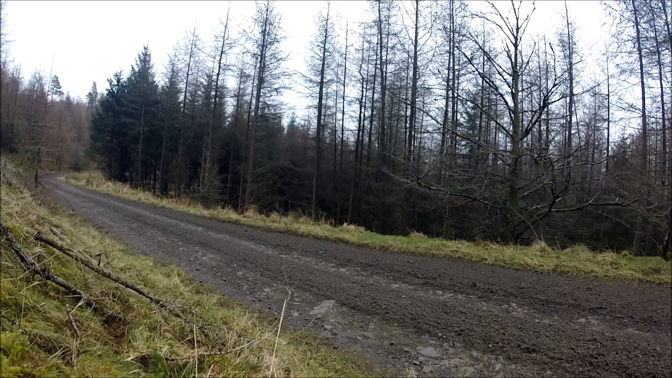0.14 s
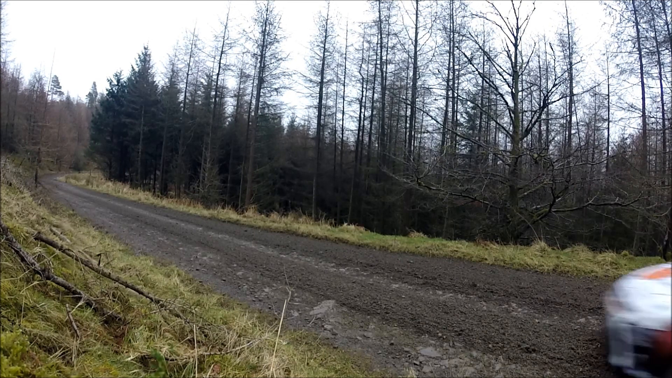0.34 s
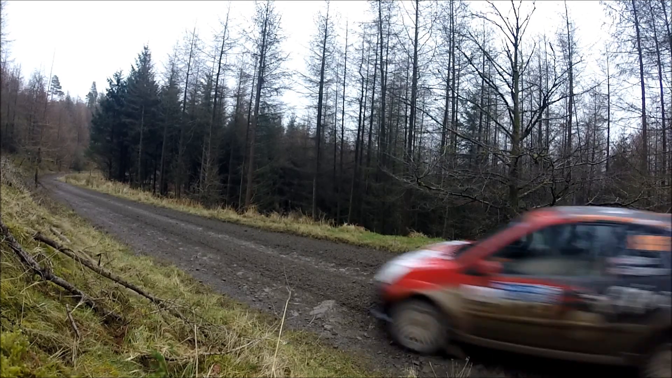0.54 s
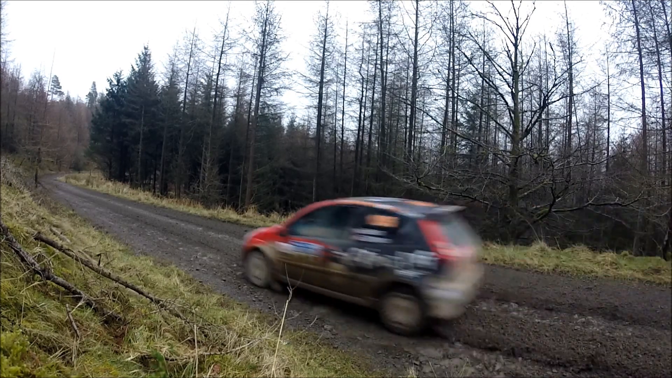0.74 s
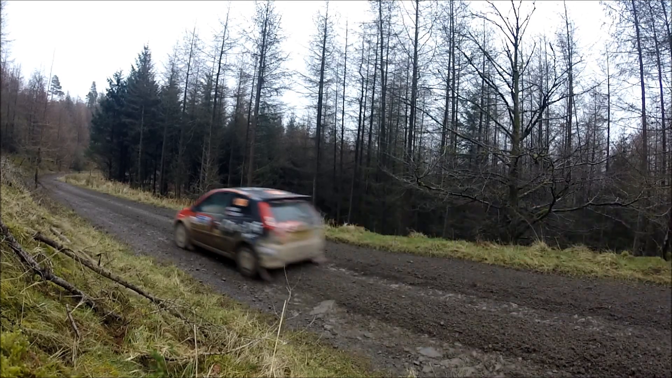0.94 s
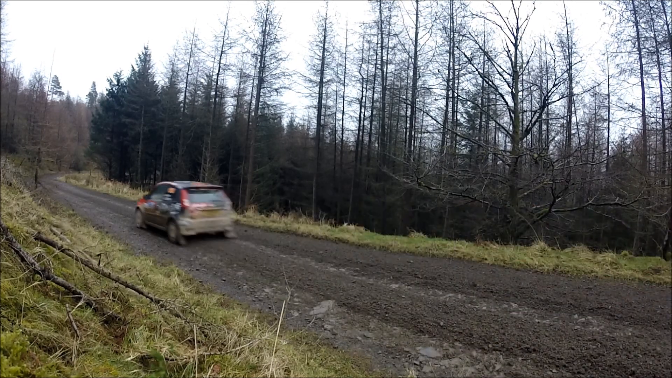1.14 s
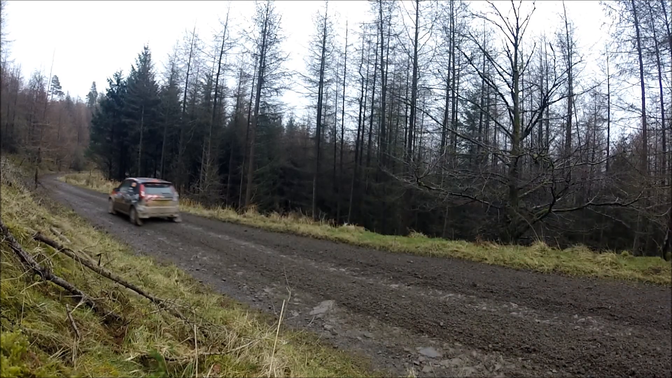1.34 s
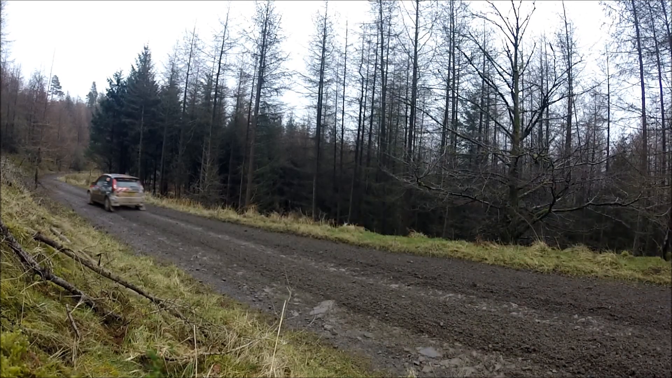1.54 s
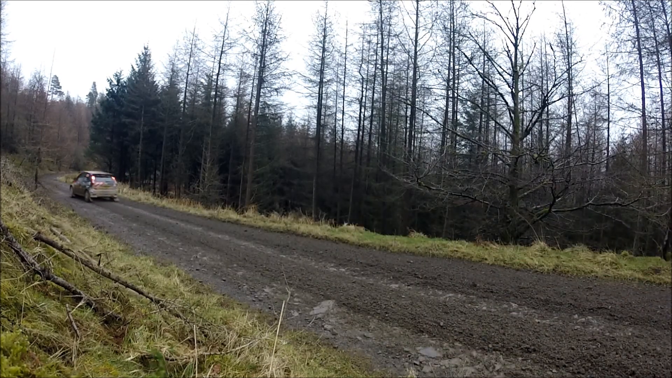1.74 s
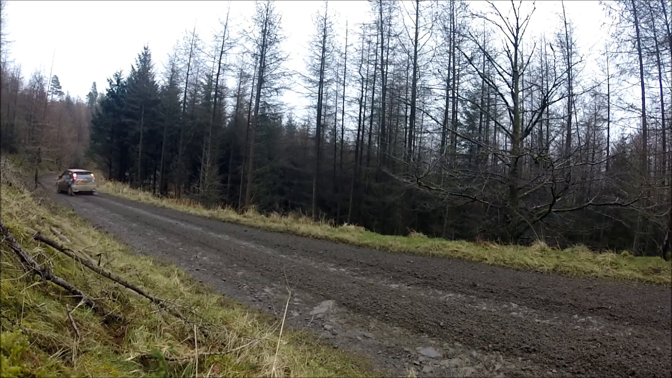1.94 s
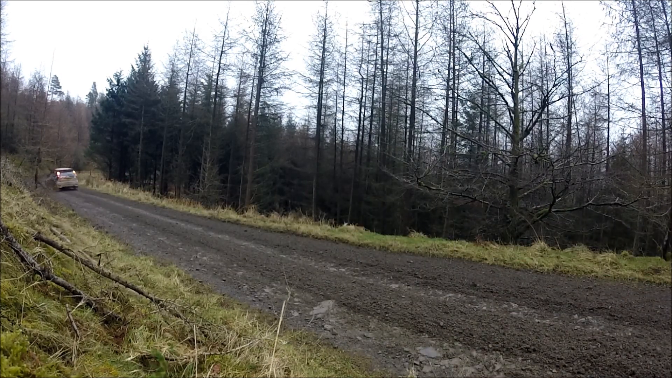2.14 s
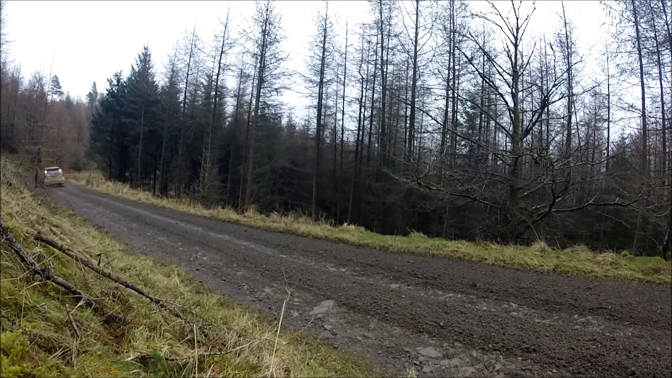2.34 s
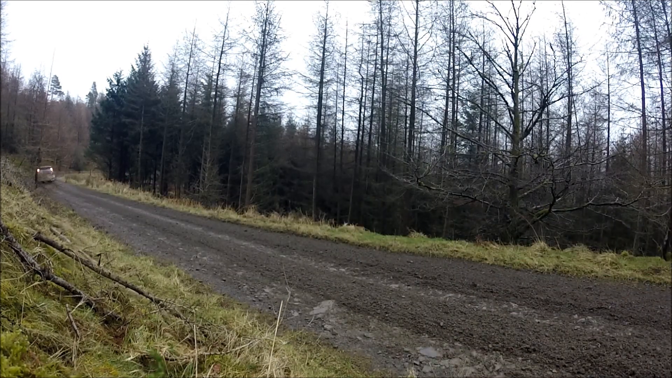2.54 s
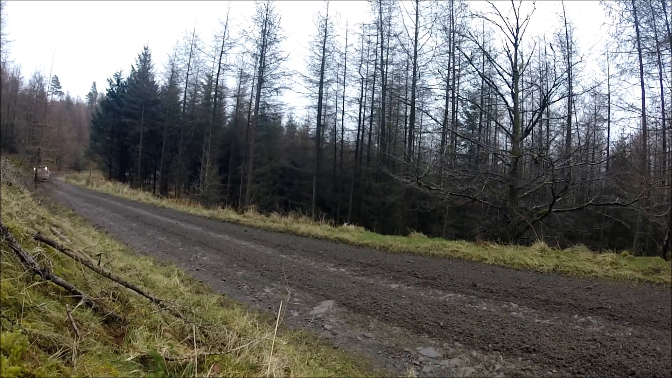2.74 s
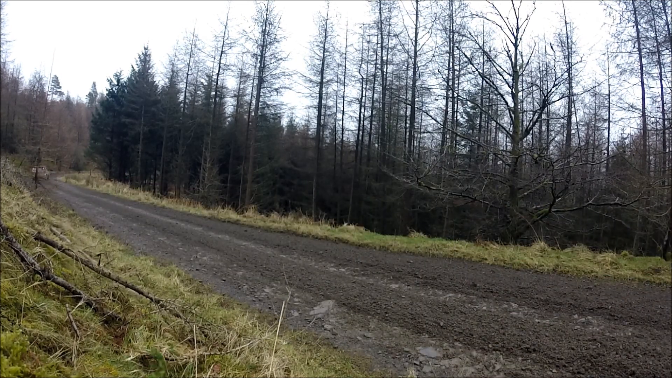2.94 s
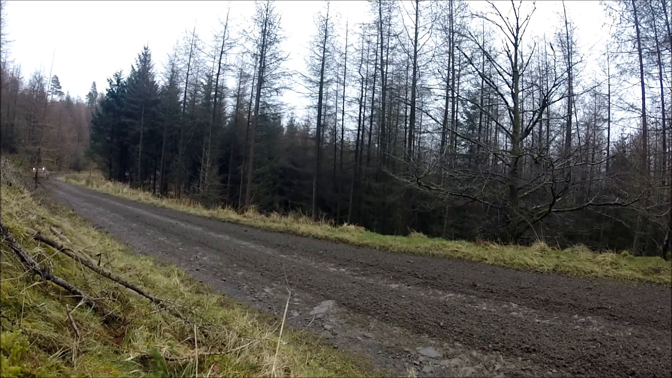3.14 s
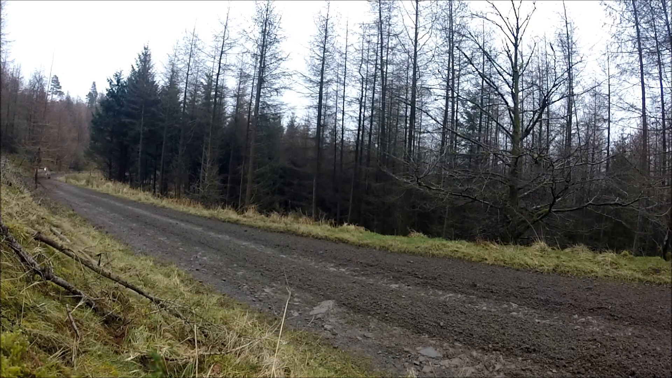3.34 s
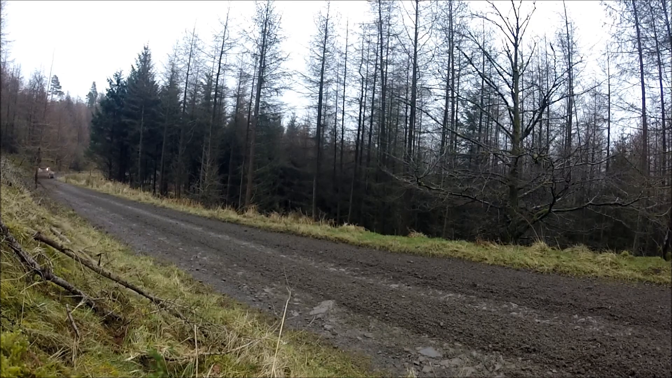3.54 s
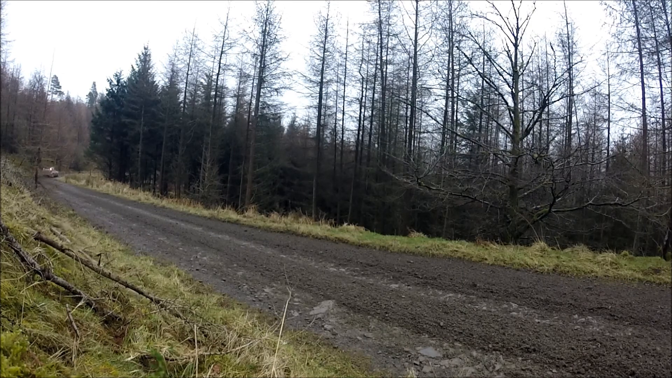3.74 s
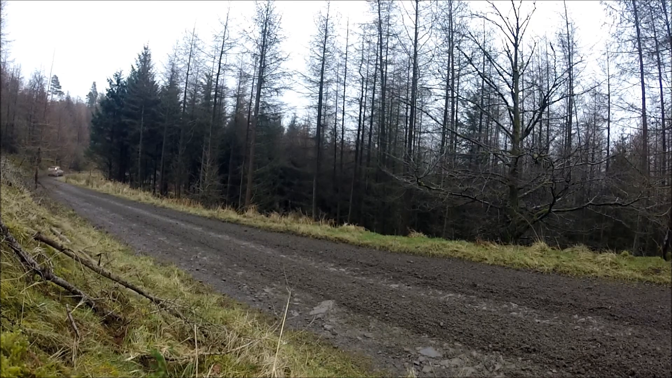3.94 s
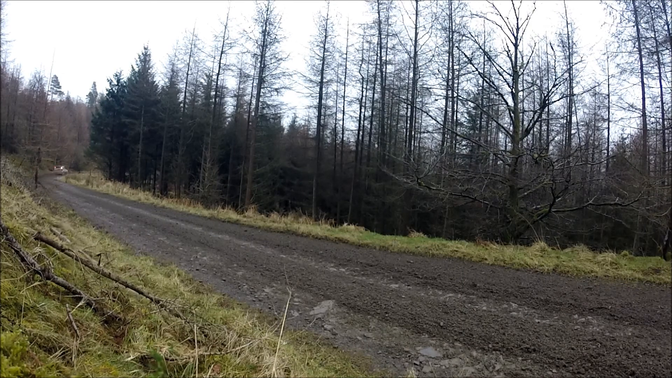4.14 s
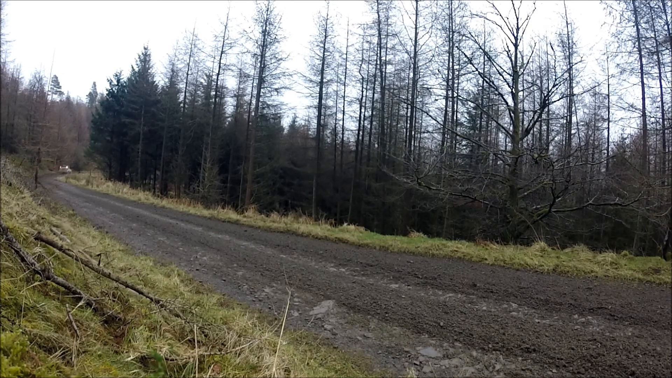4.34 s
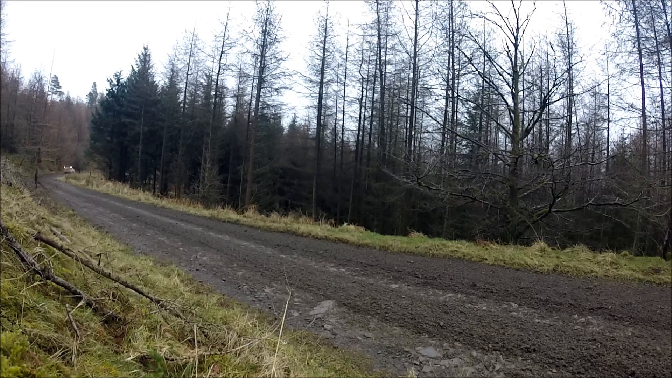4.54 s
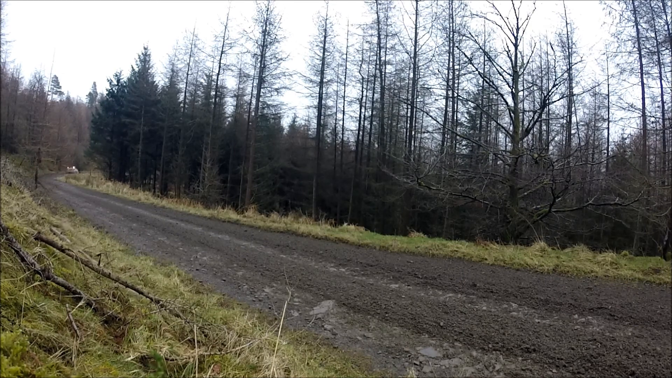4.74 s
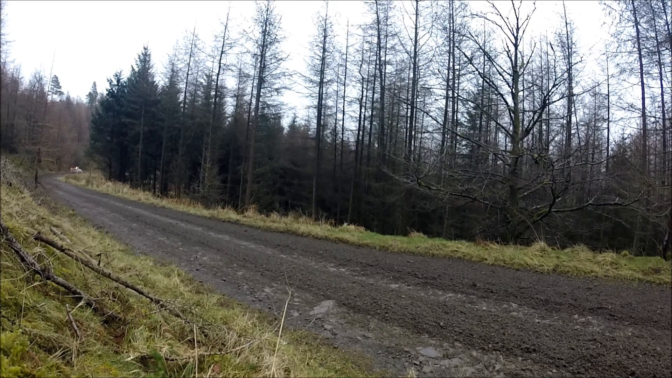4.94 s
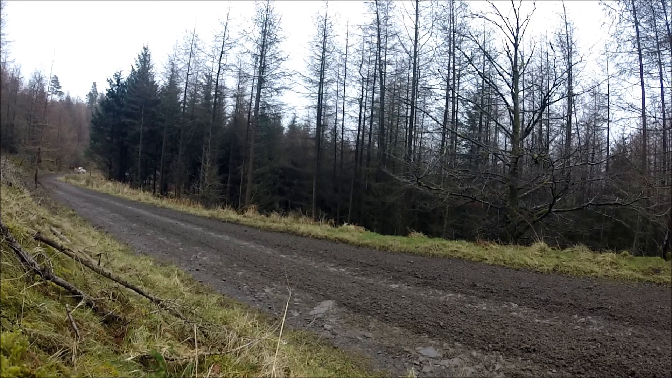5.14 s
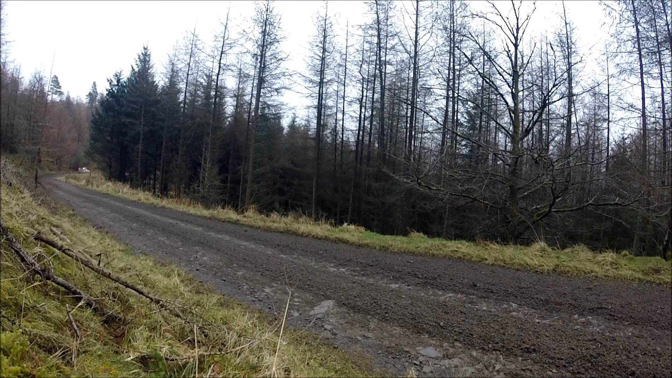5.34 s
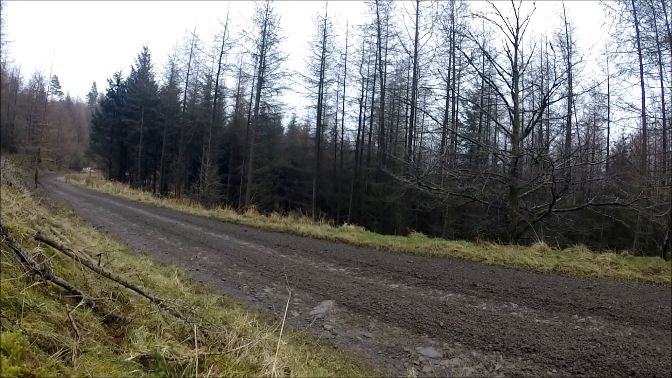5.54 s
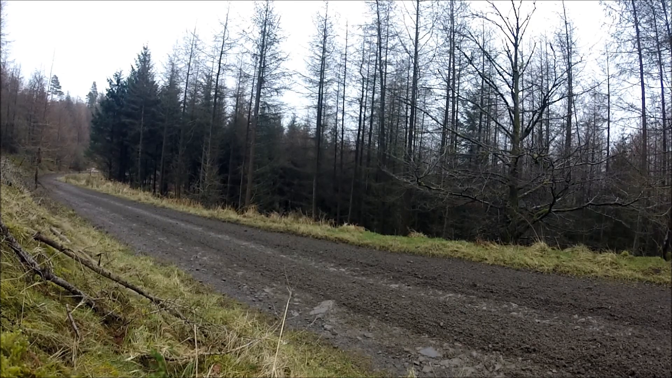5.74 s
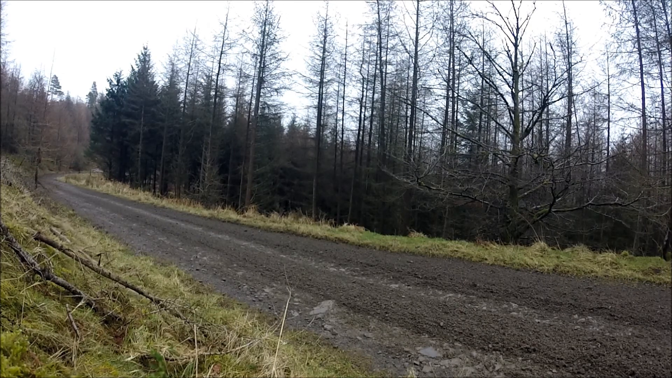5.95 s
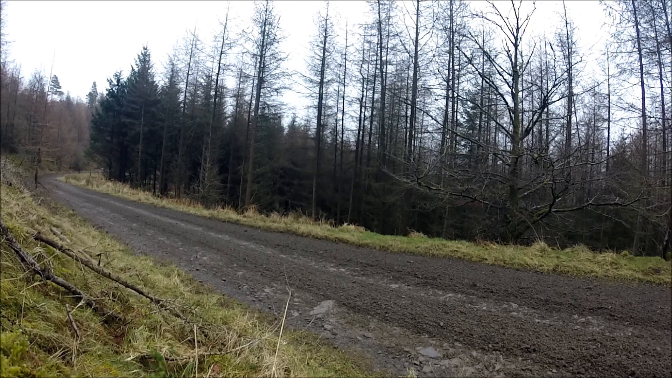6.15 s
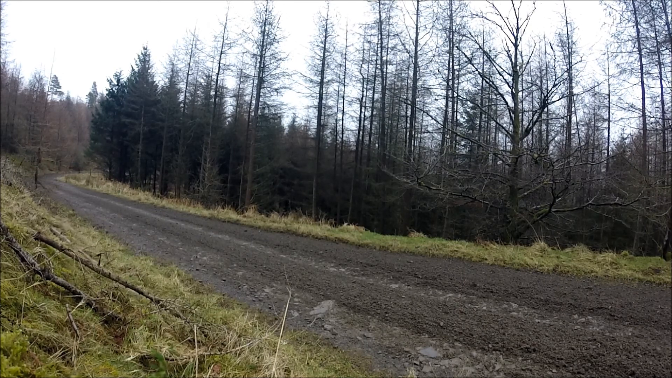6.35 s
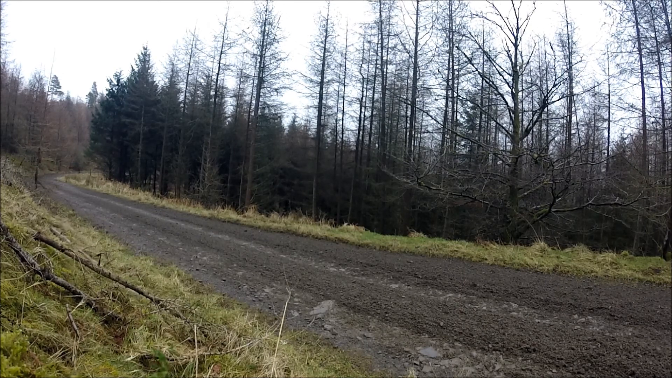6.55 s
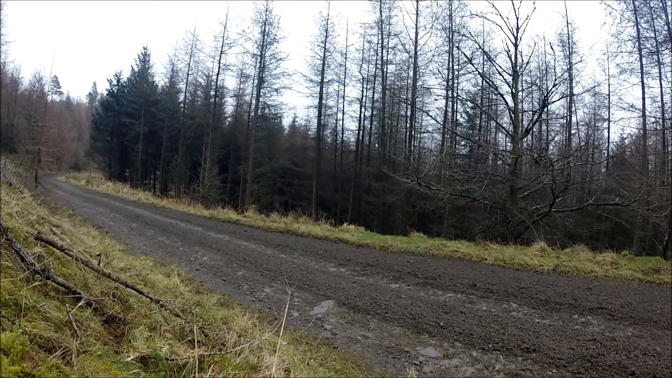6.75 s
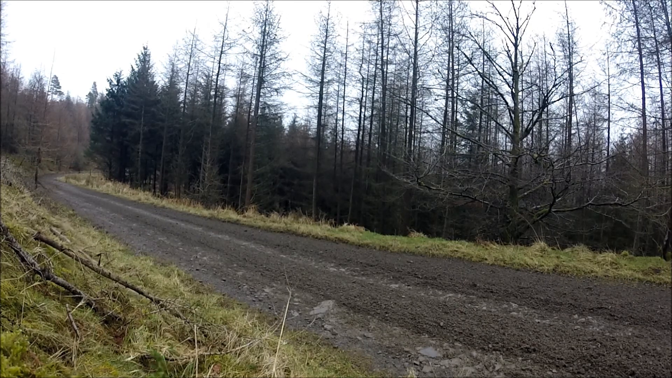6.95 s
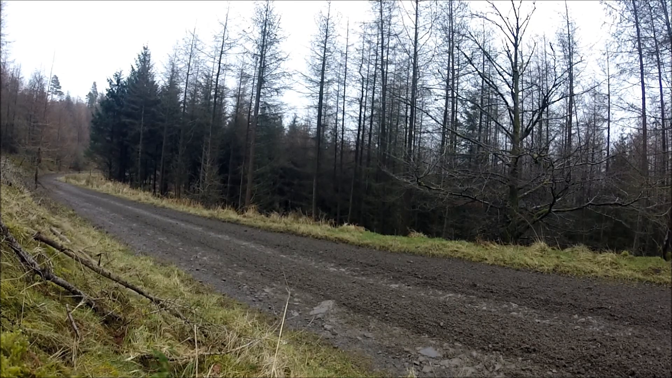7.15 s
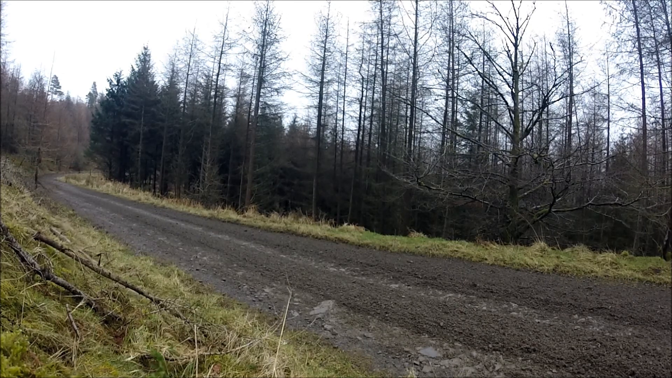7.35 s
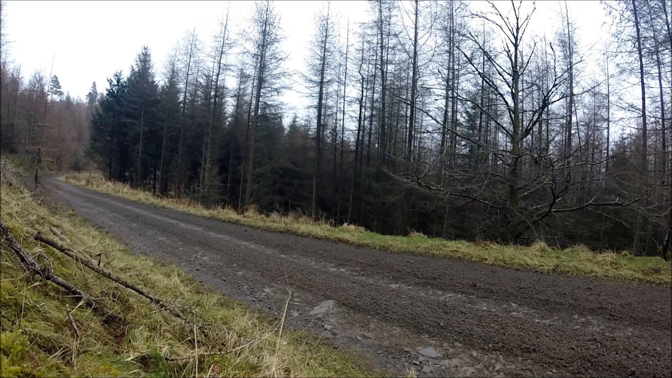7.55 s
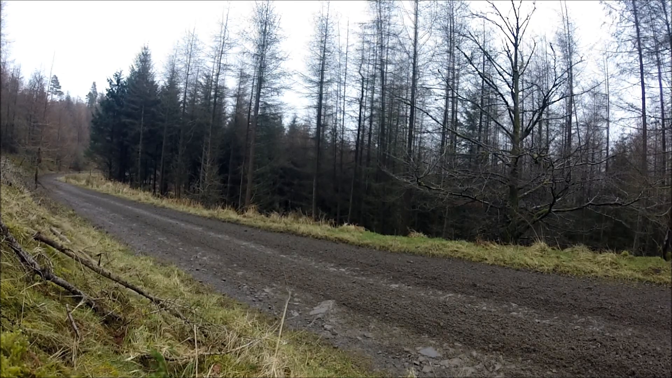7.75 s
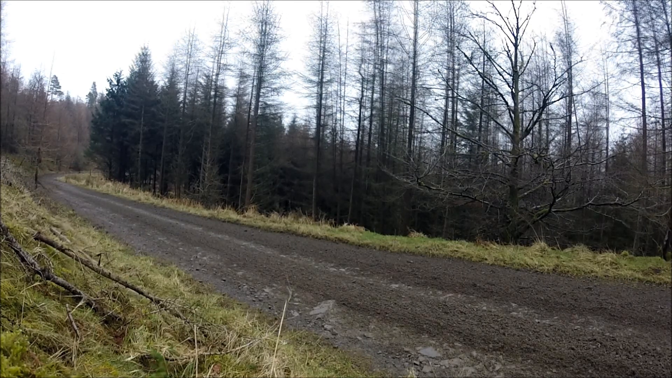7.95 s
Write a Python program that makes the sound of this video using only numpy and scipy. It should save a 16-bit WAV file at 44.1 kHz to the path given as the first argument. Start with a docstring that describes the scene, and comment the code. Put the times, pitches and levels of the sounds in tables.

```python
"""A rally car rushes past on a gravel forest road and drives off, on and off the throttle, revving up again far away.
Its exhaust booms at the firing rate, barks in overtones and rasps once per firing, as knocks and puffs of noise.
Shaped noise makes the roar of tyres and flung stones, the spray, the pops, the echo off trunks and the far hiss.
The microphone sits in a sealed housing whose air rings in a row of resonances."""
import sys
import numpy as np
from scipy import signal
from scipy.fft import rfft, irfft, next_fast_len
from scipy.io import wavfile
from scipy.ndimage import map_coordinates

SR = 44100
rng = np.random.default_rng(int(sys.argv[2]) if len(sys.argv) > 2 else 0)


def log_audio(samples):
    """Write samples as a 16-bit WAV file to the path given in sys.argv[1]."""
    # one column per channel
    frames = np.atleast_2d(samples).T
    # limit to full scale, then quantise
    limited = np.clip(frames, -1, 1)
    pcm = np.round(limited * 32767).astype(np.int16)
    wavfile.write(sys.argv[1], SR, pcm)


def level_to_linear(level):
    """Convert decibel levels to linear amplitude factors, elementwise."""
    exponent = np.asarray(level, float) / 20
    return 10 ** exponent


N = 352359  # samples


def unit(x):
    """Scaled to rms 1."""
    return x / np.sqrt(np.mean(x ** 2) + 1e-20)


def curves(rows):
    """One value per sample for each column after the time."""
    s, *cols = np.transpose(rows)
    return [np.interp(np.arange(N) / SR, s, c) for c in cols]


def along(points, hz):
    """(Hz, dB) points read on a log frequency axis."""
    f, db = np.transpose(points)
    return np.interp(np.log(hz + 1), np.log(f + 1), db)


def wobble(rate):
    """A smooth random curve, rate knots a second."""
    knots = rng.standard_normal(int(N * rate / SR) + 4)
    return map_coordinates(knots, [np.arange(N) * rate / SR])


def coloured(x, gain_db):
    """x through a causal minimum-phase filter whose gain in dB is a function of frequency."""
    m = 2 * next_fast_len(N // 2 + 4096)
    floored_db = np.maximum(gain_db(np.fft.rfftfreq(m, 1 / SR)), -100)
    cepstrum = irfft(np.log(level_to_linear(floored_db)), m)
    # folding the cepstrum onto positive time makes the filter causal
    cepstrum[1:m // 2] *= 2
    cepstrum[m // 2 + 1:] = 0
    return irfft(rfft(x, m) * np.exp(rfft(cepstrum)), m)[..., :N]


def shaped(x, spectrum):
    """x coloured by (Hz, dB) points, rms 1."""
    return unit(coloured(x, lambda hz: along(spectrum, hz)))


def resonance(x, centre_hz, width_hz):
    """x ringing in a steep-sided mode, rms 1."""
    def gain_db(hz):
        detuning = (hz ** 2 - centre_hz ** 2) / ((hz + 1) * width_hz)
        return -20 * np.log10(1 + detuning ** 2)
    return unit(coloured(x, gain_db))


def engine():
    """Boom, bark and rasp share the phase of the firings."""
    # engine speed, climbing under throttle and sagging off it: start_s, firing_rate_hz
    speed_rows = [(0, 147.1), (.126, 129.1), (.17, 140.3), (.32, 129.2), (.56, 159.9), (.66, 165.4),
                  (.92, 169.9), (.99, 159), (1.09, 156.5), (1.14, 164.3), (1.3, 169.5), (1.55, 162),
                  (1.75, 169.1), (1.99, 174.3), (2.19, 145.5), (2.29, 146.8), (2.41, 174.1), (2.51, 163.4),
                  (2.68, 135.6), (2.86, 148.5), (2.97, 167.7), (3.3, 181.5), (3.43, 184.4), (3.54, 147.8),
                  (3.76, 139.9), (3.85, 157.7), (4.07, 165.2), (4.33, 143.7), (4.67, 123.7), (4.76, 141),
                  (4.9, 141.4), (5.05, 119.9), (5.19, 146.2), (5.32, 141), (5.43, 150), (5.75, 95.1),
                  (5.95, 89.9), (5.99, 111.5), (6.08, 135.1), (6.33, 138.5), (6.5, 148.6), (6.64, 169),
                  (6.77, 181.1), (6.96, 186.5), (7.24, 167.3), (7.42, 169.5), (7.63, 187.6), (7.99, 205.3)]
    # colour of the exhaust as the car turns: start_s, loudest_ring_hz, ring_over_broad_rasp_db,
    # bark_tilt_db_per_octave, octave_overtone_lift_db
    colour_rows = [(0, 2300, 7.5, 1.5, 1.5), (.55, 1870, 2, -3, 3.5), (.9, 2231, 8, -5.5, -11),
                   (1.05, 2920, 4, 3.5, 3.5), (1.25, 3100, 3, 2, -7), (1.4, 1630, -5.5, 2, 1.5),
                   (1.7, 1500, 2.5, 3.5, -2.5), (2, 2100, -7, -3, -7), (3, 1550, -4, -2, -14.5),
                   (5.05, 1500, -7, -1.5, 4), (5.25, 1500, -0.5, -3.5, -7), (6, 1500, -5.5, -1.5, 4),
                   (6.2, 1500, -9, 1.5, -1), (6.95, 1549, 0.5, 7.5, -6), (7.2, 1799, 1, -1, -10),
                   (7.45, 2822, 2, 6.5, -4), (7.62, 2300, 4, 7.5, -2), (7.99, 2720, 4, 0.5, -5.5)]
    hz, = curves(speed_rows)
    boom_gain, bark_gain, rasp_gain = driver(hz)
    ring_hz, ring_db, tilt_db, octave_db = curves(colour_rows)
    turns = np.cumsum(hz * (1 + .004 * wobble(40))) / SR  # in firings
    boom = np.sqrt(2) * np.cos(2 * np.pi * turns) * boom_gain
    bark = overtones(hz, turns, tilt_db, octave_db)
    rasp = firing_rasp(turns, ring_hz, ring_db)
    return boom - bark_gain * bark + rasp_gain * level_to_linear(1.5 * wobble(17)) * rasp


def driver(hz):
    """Gains of boom, bark and rasp from the pass, the stabs of throttle and the coasting between."""
    # the close pass, coasting in, then flat out until the driver lifts:
    # start_s, boom_db, bark_db, rasp_db
    pass_rows = [(0, -42.5, -70, -40), (.166, -31.5, -47.5, -29), (.3, -38, -55, -32.5),
                 (.345, -23.5, -47.5, -29), (.6, -19, -31.5, -22.5), (.92, -17, -26.5, -14),
                 (1.09, -17.5, -23.5, -23), (1.24, -16, -20, -17), (1.42, -17, -25, -28),
                 (1.75, -21, -26, -25.5), (2.0, -21.5, -32, -29), (2.19, -41.5, -64.5, -56),
                 (2.3, -49, -80, -70)]
    # later stabs of throttle, farther off: open_s, shut_s, boom_db, boom_change_db_per_s,
    # bark_db, bark_change_db_per_s, rasp_db (at mid_hz)
    throttle_rows = [(2.287, 2.445, -25, -8, -39, -27, -40), (2.591, 2.693, -40, 1, -68, 1, -66),
                     (2.86, 3.36, -28.5, -12, -48, -0.5, -43.5), (3.767, 3.89, -34, -18, -49, -15, -50),
                     (3.934, 4.17, -35, -24, -46.5, -30, -49), (5.065, 5.395, -35.5, -15, -58, -6, -48),
                     (5.984, 6.313, -40, -3, -59.5, -2, -50.5),
                     (6.479, 7.079, -44.5, -9, -60.5, 11.5, -51.5), (7.332, 8.098, -45, -3.5, -51, 11, -46)]
    # coasting after a lift, firing unevenly: start_s, end_s, boom_db, unevenness_db
    coast_rows = [(2.158, 2.296, -44, 11.5), (2.506, 2.866, -45.5, 2.5), (3.453, 3.779, -41.5, -1.8),
                  (4.291, 4.556, -43, 4), (4.569, 4.778, -44.5, -1), (4.798, 5.042, -44.5, -1),
                  (5.44, 5.982, -53, 2), (6.329, 6.492, -56, 5), (7.05, 7.446, -50, -0.5)]
    open_s, rasp_open_s, gentle_open_s, coast_rise_s = .013, .023, .1, .049  # time constants
    shut_db_per_s, rasp_shut_db_per_s = 300, 90
    even_db, arrival_burble_db, arrival_s = .6, 3, .33
    coast_bark_db, coast_rasp_db = -25.5, -17.5  # re boom
    rasp_db_per_oct, mid_hz = 18, 168.3  # harsher at higher revs
    waver_from_s, waver_db = 7.3, 3

    t = np.arange(N) / SR
    boom, bark, rasp = level_to_linear(curves(pass_rows)) * (t < pass_rows[-1][0])
    uneven = 2 * np.tanh(wobble(70) / 2)
    boom = boom * level_to_linear(np.where(t < arrival_s, arrival_burble_db, even_db) * uneven)
    octaves = np.log2(hz / mid_hz)
    for start, end, boom_db, slope_db, bark_db, swell_db, rasp_db in throttle_rows:
        # the last stab swells in gently and its boom wavers
        gentle = start > waver_from_s
        load = gate(start, end, gentle_open_s if gentle else open_s, shut_db_per_s)
        rasp_load = gate(start, end, gentle_open_s if gentle else rasp_open_s, rasp_shut_db_per_s)
        held_s = np.clip(t - start, 0, end - start)
        uneven_db = (waver_db if gentle else even_db) * uneven
        boom = boom + load * level_to_linear(boom_db + slope_db * held_s + uneven_db)
        bark = bark + load * level_to_linear(bark_db + swell_db * held_s)
        rasp = rasp + rasp_load * level_to_linear(rasp_db + rasp_db_per_oct * octaves)
    for start, end, boom_db, uneven_db in coast_rows:
        idle = level_to_linear(boom_db) * gate(start, end, coast_rise_s, shut_db_per_s)
        boom = boom + idle * level_to_linear(uneven_db * uneven)
        bark = bark + idle * level_to_linear(coast_bark_db)
        rasp = rasp + idle * level_to_linear(coast_rasp_db)
    return boom, bark, rasp


def gate(start, end, rise_s, fall_db_per_s):
    """Opens at start, dies away after end."""
    t = np.arange(N) / SR
    opening = 1 - np.exp(-np.maximum(t - start, 0) / rise_s)
    return opening * level_to_linear(-fall_db_per_s * np.maximum(t - end, 0))


def overtones(hz, turns, tilt_db, octave_db):
    """Bark: overtones 2 to 20 of the firing rate, coloured by the pipe."""
    # overtones leaving the pipe, before tilt and drift: frequency_hz, level_db
    pipe_points = [(230, 5), (290, -2), (350, -3.5), (500, -4), (700, -6.5), (950, -0.5), (1250, -13.5),
                   (1550, -7), (1900, -28), (2300, -22), (3200, -18.5), (4200, -37)]
    bark = 0
    for k in range(2, 21):
        level_db = along(pipe_points, k * hz) + tilt_db * np.log2(k * hz / 750) + (k == 2) * octave_db
        # strength and phase drift as sound paths through the trees shift; phase more for higher overtones
        drift_db = 2.8 * wobble(7.6)
        phase = 2 * np.pi * k * (turns - .5) + 0.19 * k * wobble(30)
        bark = bark + level_to_linear(level_db + drift_db) * np.cos(phase)
    return bark


def firing_rasp(turns, ring_hz, ring_db):
    """Each firing is a sharp knock, slightly early or late, in the trough of the boom, and a puff of turbulent gas."""
    # broad part of the rasp, spectrum shape: frequency_hz, density_db_per_hz
    gas_points = [(300, -18), (900, -4), (1600, -15), (2500, 2), (4500, -23.5), (7500, -28), (10000, -66.5),
                  (16000, -65)]
    # panels and silencer ringing at each firing, before the pull of the loudest ring:
    # centre_hz, width_hz, level_db
    body_rows = [(1510, 216, -2), (1772, 180, -8.5), (2271, 236, 0), (3100, 500, -1)]
    late, size = rng.standard_normal((4000, 2)).T
    cycle = (turns - .4).astype(int) + 1
    fired = np.flatnonzero(np.diff(cycle))
    firing = cycle[fired]
    knock_at = fired + (.00004 * SR * late[firing]).astype(int)
    knocks = np.bincount(np.clip(knock_at, 0, N - 1), level_to_linear(1.4 * size[firing]), N)
    puff_shape = .45 + np.exp(-4 * ((turns - .4) % 1))
    puffs = level_to_linear(1.8 * size[cycle]) * puff_shape * rng.standard_normal(N)
    blows = .85 * unit(knocks) + .55 * unit(puffs)
    rings = 0
    for centre_hz, width_hz, db in body_rows:
        off_db = -48 * np.log2(ring_hz / centre_hz) ** 2  # modes far from the loudest ring fade
        rings = rings + level_to_linear(db + off_db + 1.5 * wobble(9)) * resonance(blows, centre_hz, width_hz)
    rasp = shaped(puffs, gas_points) + level_to_linear(ring_db) * rings
    return rasp / np.sqrt(1 + level_to_linear(2 * ring_db))


def pops():
    """Unburnt fuel popping in the pipe, stones knocking the floor pan: short decaying bursts of band noise."""
    # start_s, level_db (before onset and decay), ring_hz, t60_s
    pop_rows = [(.134, -17, 1890, 0.05), (.144, -21, 2300, 0.044), (.171, -15, 2060, 0.078),
                (.296, -21, 2450, 0.048), (0.438, -22, 2400, .05), (2.238, -29, 2900, 0.019),
                (5.385, -48, 1500, 0.039)]
    out, t = np.zeros(N + SR), np.arange(SR // 10) / SR
    for s, db, ring_hz, t60 in pop_rows:
        band = signal.butter(1, [ring_hz / 1.3, ring_hz * 1.3], "bandpass", fs=SR, output="sos")
        burst = unit(signal.sosfilt(np.tile(band, (3, 1)), rng.standard_normal(len(t))))
        onset = 1 - np.exp(-t / 0.0014)
        out[round(s * SR):][:len(t)] += level_to_linear(db - 60 * t / t60) * onset * burst
    return out[:N]


def tyres():
    """Body rumble and a roar of crushed gravel with flung stones on top."""
    # start_s, rumble_db, gravel_db (both before the trims below)
    road_rows = [(0, -47, -44), (.25, -36, -42.5), (.87, -33, -27.5), (1.15, -39, -32), (1.96, -46, -47.5),
                 (2.5, -54, -58), (3.03, -52, -66), (4.3, -67, -61.5), (4.4, -49.5, -66), (5.05, -75, -69),
                 (7.28, -63, -62.5), (7.36, -55.5, -58), (7.99, -59.5, -54.5)]
    # spectrum shapes: frequency_hz, density_db_per_hz
    stone_points = [(880, -36.5), (1500, -5.5), (2280, -7), (2690, 2.5), (3100, -9), (9000, -36),
                    (11700, -74), (19800, -120)]
    rumble_points = [(18, -42), (30, -10.5), (140, -6.5), (204, -10), (300, -16.5), (390, -27), (660, -120)]
    rumble_trim_db, gravel_trim_db, clicks_per_s = 2.0, 7.0, 1500
    rumble_db, gravel_db = curves(road_rows)
    rumble = shaped(rng.standard_normal(N), rumble_points) * level_to_linear(2.1 * wobble(4.9))
    struck = rng.random(N) < clicks_per_s / SR
    clicks = struck * level_to_linear(1.2 * rng.exponential(size=N)) * rng.standard_normal(N)
    crunch = shaped(rng.standard_normal(N) + 0.16 * unit(clicks), stone_points)
    crunch = crunch * level_to_linear(2.4 * wobble(25) + 0.47 * wobble(3.5))
    return level_to_linear(rumble_db + rumble_trim_db) * rumble + level_to_linear(gravel_db + gravel_trim_db) * crunch


def spray():
    """Fine grit and water off the wheels: two flickering treble bands, the upper one ticking with single drops."""
    # start_s, hiss_db, sizzle_db
    spray_rows = [(0, -89, -85), (.59, -49.5, -66), (.92, -51.5, -53.5), (1.2, -81, -53.5), (1.4, -67, -65),
                  (2.01, -64, -66), (2.17, -82, -79)]
    drops_per_s = 60
    hiss_db, sizzle_db = curves(spray_rows)
    hiss = level_to_linear(hiss_db + 1.5 * wobble(45)) * resonance(rng.standard_normal(N), 8860, 1500)
    drops = rng.standard_normal(N) * (1 + 10 * (rng.random(N) < drops_per_s / SR))
    return hiss + level_to_linear(sizzle_db + 1.5 * wobble(45)) * resonance(drops, 11700, 4800)


def trunks(x):
    """Tree trunks scatter a short diffuse tail; the long waves of the boom bend round them."""
    t60_s, build_s, corner_hz = 0.81, 0.013, 330
    t = np.arange(SR // 2) / SR
    tail = rng.standard_normal(len(t)) * level_to_linear(-60 * t / t60_s) * (1 - np.exp(-t / build_s))
    echo = signal.fftconvolve(x, tail / np.linalg.norm(tail))[:N]
    return coloured(echo, lambda hz: -10 * np.log10(1 + (corner_hz / (hz + 1)) ** 4))


def forest():
    """Far rumble and hiss of trees and road: nearly steady shaped noise."""
    # spectrum shape: frequency_hz, density_db_per_hz
    forest_points = [(15, -51), (25, -3.5), (109, -4.5), (345, -11.5), (558, -14), (1150, -16), (1500, -24),
                     (3180, -21.5), (3840, -37.5), (9040, -31.5), (15000, -51.5)]
    level_db = -54.5
    return level_to_linear(level_db + 0.2 * wobble(3.18)) * shaped(rng.standard_normal(N), forest_points)


def scene():
    """The car with its echoes, over the forest."""
    car = engine() + pops()
    echo_db = -11
    return (car + level_to_linear(echo_db) * trunks(car) + tyres() + spray() + forest())[None]


def top_cut(x):
    """Nothing passes above the cut-off."""
    return signal.sosfilt(signal.butter(12, 15190, fs=SR, output="sos"), x)


def record(dry):
    """Air in the sealed housing lifts some bands and dips others."""
    # centre_hz, width_hz, lift_db
    housing_rows = [(1500, 270, 2.5), (2300, 140, -1), (3160, 240, 1.5), (4500, 830, 7.5), (6010, 280, 8),
                    (7270, 540, 3), (12200, 900, 2), (1232, 420, -3.5), (2700, 325, -10), (8370, 610, -4.5)]

    def gain_db(hz):
        return sum(db / (1 + (2 * (hz - c) / w) ** 2) for c, w, db in housing_rows)
    boxed = coloured(dry, gain_db)
    return top_cut(boxed)


dry = scene()
out = record(dry)
log_audio(out)
```